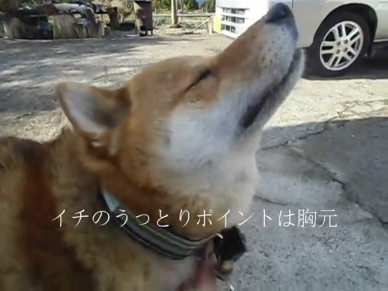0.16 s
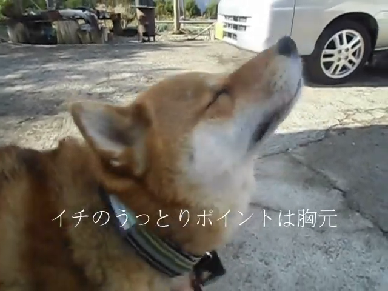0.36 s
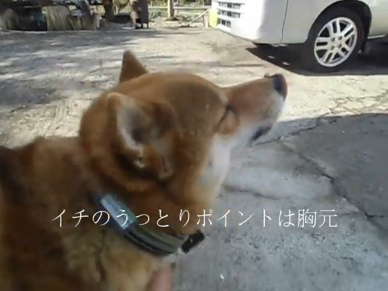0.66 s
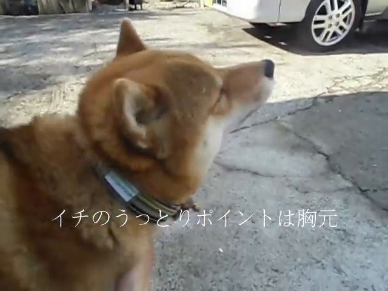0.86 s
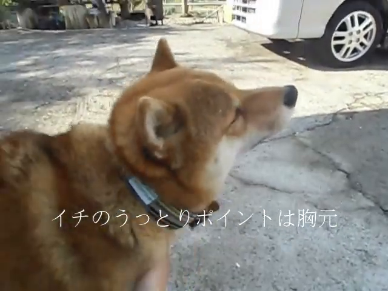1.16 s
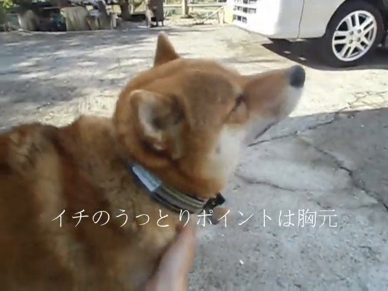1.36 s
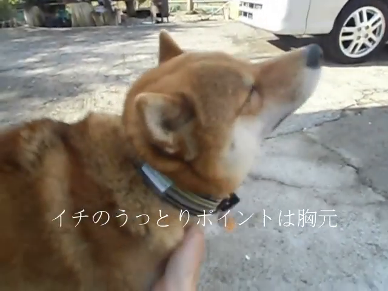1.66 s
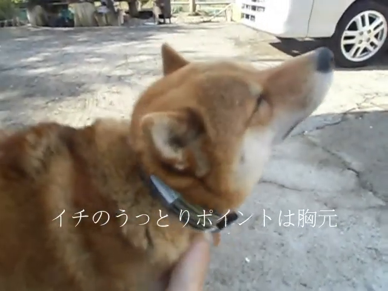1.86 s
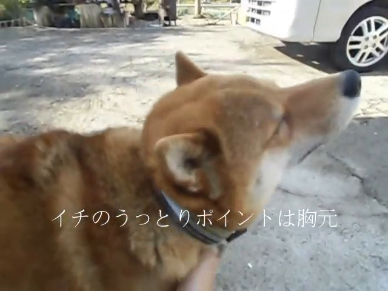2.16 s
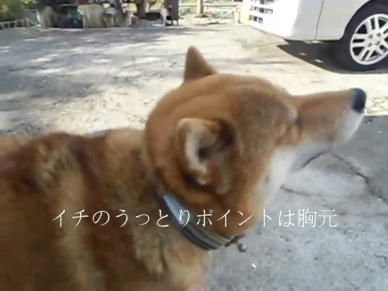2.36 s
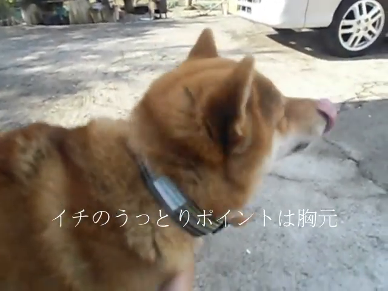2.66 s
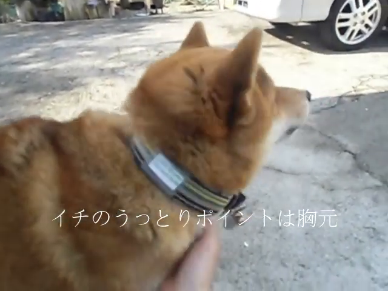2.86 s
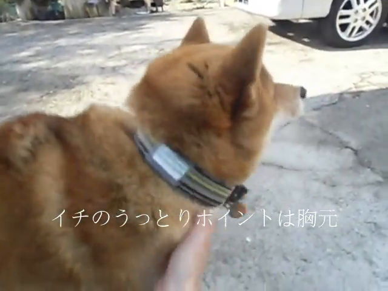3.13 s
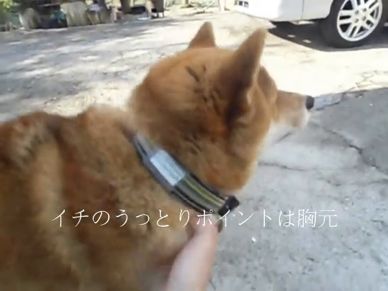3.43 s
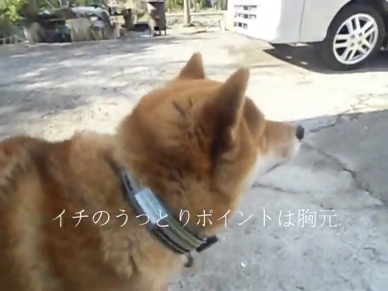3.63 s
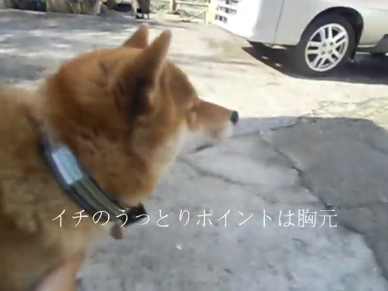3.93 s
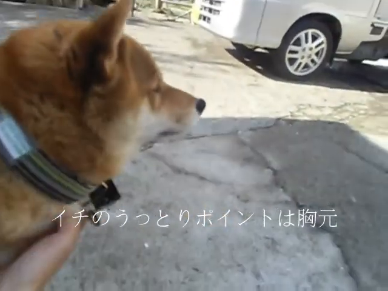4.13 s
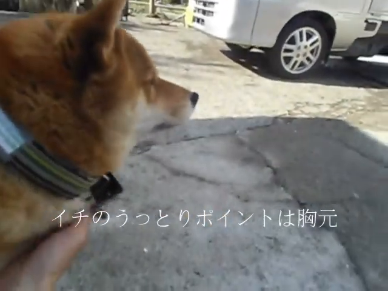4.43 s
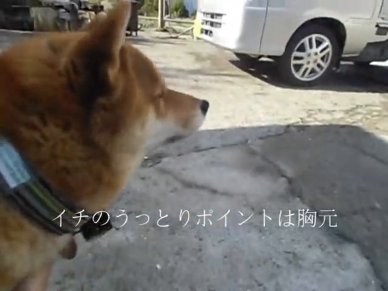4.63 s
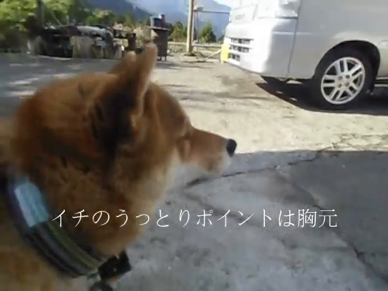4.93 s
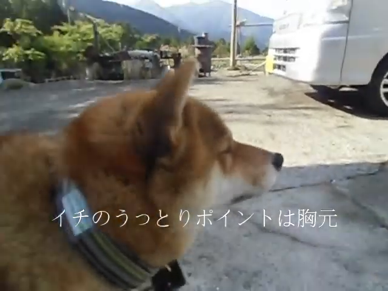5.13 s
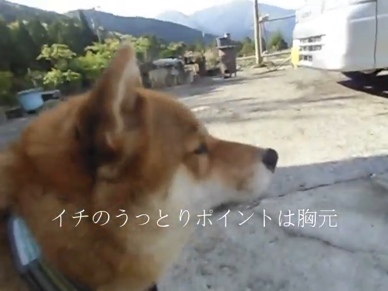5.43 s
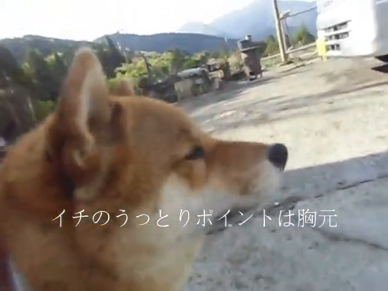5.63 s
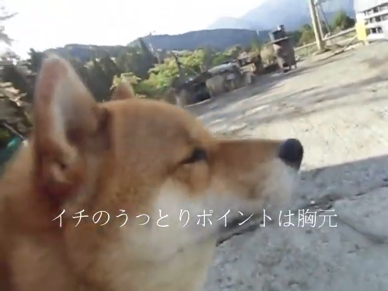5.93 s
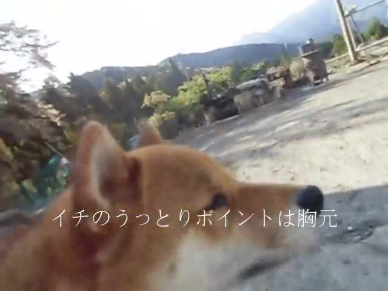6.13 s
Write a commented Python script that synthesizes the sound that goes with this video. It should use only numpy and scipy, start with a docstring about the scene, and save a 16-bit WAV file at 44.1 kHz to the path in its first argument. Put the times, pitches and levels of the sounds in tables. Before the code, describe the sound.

Thin metal tags clink and jingle irregularly on a dog's collar as a hand rubs its chest, over quiet outdoor air and faint birds.

```python
"""Two thin metal tags, one round and one small, clink on a dog's collar as a hand rubs its chest outdoors.
Behind: air rumble, hiss, gusts, a faint whine and far bird calls. Short recorder pops break in.
Rings are decaying sine modes restarted at each touch; rattle and shimmer are decaying noise.
Calls are gliding sines, air is shaped noise, pops are flat offsets at set times.
The sum is clipped and low-passed."""
import sys
import numpy as np
from scipy import signal
from scipy.fft import rfft, irfft
from scipy.io import wavfile

SR = 44100
rng = np.random.default_rng(int(sys.argv[2]) if len(sys.argv) > 2 else 0)


def to_wav(s):
    """Save 16-bit WAV."""
    ch = np.atleast_2d(s).T  # columns
    pcm = np.round(np.clip(ch, -1, 1) * 32767)  # PCM
    wavfile.write(sys.argv[1], SR, pcm.astype(np.int16))


N = 277377

# Metal touches: (time [s], rattle level [dB], round tag ring [dB], angle struck [deg],
# distance from centre [1 = rim], small tag ring [dB],
# damping by fur [1 = the listed t60, smaller rings longer, larger dies sooner])
TAG_TOUCHES = [(0.044, -55, -68.5, 50.0, 0.22, -52, 0.64), (0.073, -56, -58, 64, 0.22, -48, 0.31),
               (0.1013, -27, -42, 10.0, 1.0, -75, 0.74), (0.1159, -15, -24.0, 254, 0.31, -34, 2),
               (0.156, -43, -61.0, 230.0, 0.3, -48, 0.67), (0.1771, -43, -42, 260, 1.0, -44, 0.48),
               (0.2012, -28, -40.5, 20.0, 0.1, -36, 0.42), (0.219, -33, -46, 290.0, 0.3, -36, 0.88),
               (0.232, -47, -54.0, 130.0, 0.2, -35.5, 1.8), (0.2518, -39.5, -37.5, 36, 0.6, -61, 0.68),
               (0.299, -43, -49, 310.0, 0.3, -52, 2), (0.347, -29.5, -27, 20.0, 0.43, -76, 3.2),
               (0.3704, -33, -48, 123, 0.36, -66, 0.47), (0.438, -36.5, -43, 440, 0.1, -62, 0.3),
               (0.451, -37, -36, 236, 0.6, -75, 0.72), (0.5663, -34, -63, 80.0, 0.2, -42, 0.41),
               (0.58, -37.5, -65, 90.0, 0.1, -38, 0.51), (0.6067, -52, -62, 250, 1.0, -44, 0.6),
               (0.654, -36.5, -36, 150, 1.0, -75, 0.17), (0.6656, -26, -28.5, 35, 0.47, -73, 1.8),
               (0.741, -36, -44, 140.0, 0.1, -69, 1.4), (0.757, -37, -32.5, 124, 0.66, -75, 0.77),
               (0.802, -36, -31.5, 6.8, 0.55, -72, 2.8), (0.8231, -42, -38, 180, 1.0, -75, 1.5),
               (0.8482, -28, -30, 280.0, 0.5, -58, 0.96), (0.888, -36, -49, 40.0, 0.1, -40.5, 0.77),
               (0.9748, -34, -40, 58, 0.15, -70, 1.1), (0.985, -30.5, -37.0, 62, 0.08, -75, 4.6),
               (1.034, -40, -37, 140, 0.62, -36, 0.5), (1.039, -12, -21.5, 150, 0.65, -75, 1.6),
               (1.0453, -40, -19.5, 207, 0.56, -75, 3.1), (1.115, -33.5, -29.5, 270.0, 1.0, -70, 0.2),
               (1.1414, -43, -37.5, 310, 1.0, -58, 1.1), (1.1868, -39.5, -50, 58, 0.3, -55, 0.68),
               (1.2685, -29, -22.5, 306, 1.0, -67, 1.5), (1.2785, -36, -31, 380, 0.25, -72, 1),
               (1.2871, -28.5, -33, 280, 0.3, -75, 0.62), (1.322, -33, -37, 470, 0.12, -75, 4),
               (1.333, -42, -39, 270, 0.1, -71, 1.2), (1.359, 0.5, -25.0, 230.0, 0.63, -70, 1.14),
               (1.3674, -46, -20, 210.0, 0.86, -75, 2.5), (1.3996, -39, -39, 29, 0.4, -71, 1.1),
               (1.4153, -37, -31, 240, 0.86, -75, 2.5), (1.423, -35.5, -42, 440, 0.65, -75, 0.35),
               (1.4388, -40, -26.5, 273, 0.57, -44, 2.2), (1.477, -46, -44, 86, 0.35, -60, 0.16),
               (1.6181, -31, -28.5, 317, 0.48, -61, 1.5), (1.6398, -25.5, -32.5, 54, 0.11, -75, 1.23),
               (1.6636, -44, -44.0, 85, 0.2, -75, 0.5), (1.714, -34, -36, 147, 0.54, -75, 0.45),
               (1.732, -47, -36.5, 160, 0.3, -75, 3.3), (1.777, -36, -53, 65, 0.18, -42.5, 0.83),
               (1.8937, -48, -61.0, 250.0, 0.13, -47, 0.4), (1.9032, -43, -45, 260, 0.6, -59, 1.6),
               (1.932, -37, -43, 440, 0.12, -67, 0.36), (1.9605, -42, -44, 40.0, 0.2, -75, 0.35),
               (2.0064, -9, -34, 40.0, 0.16, -75, 1.34), (2.041, -47, -33.5, 78, 0.57, -75, 3.1),
               (2.0647, -41, -50, 97, 0.47, -38.5, 0.6), (2.208, -31.5, -33, 200, 0.17, -75, 1.7),
               (2.23, -34, -36.5, 315, 0.33, -72, 0.47), (2.2645, -35, -40, 70, 0.25, -71, 0.69),
               (2.285, -43, -40.5, 40.0, 0.1, -64, 2.4), (2.3363, -49, -62, 90.0, 0.2, -43.5, 0.89),
               (2.3791, -50, -46.5, 74, 0.86, -59, 0.46), (2.4644, -51, -43, 110.0, 1, -75, 1.7),
               (2.4826, -27.5, -32.5, 11, 0.57, -66, 1.15), (2.511, -35, -41, 190, 0.4, -75, 0.46),
               (2.517, -26, -24, 240, 0.26, -75, 1.4), (2.5705, -29.5, -41.5, 420, 0.12, -75, 1.4),
               (2.5867, -38, -44.0, 70, 0.22, -69, 2), (2.651, -35.5, -44.5, 83, 0.59, -38, 0.43),
               (2.7573, -29, -26.0, 35, 0.66, -69, 1.3), (2.8069, -7, -26.0, 58, 0.14, -80, 1.5),
               (2.948, -47, -57.0, 120.0, 1.0, -43.5, 0.32), (2.972, -51, -57, 360.0, 0.8, -45, 1),
               (3.0525, -39.5, -42, 70.0, 0.3, -40, 0.63), (3.081, -32, -33, 22, 0.45, -70, 0.38),
               (3.094, -30, -40.0, 37, 0.24, -64, 1.4), (3.135, -52, -38, 180, 1.0, -75, 2.9),
               (3.1668, -47, -45, 360.0, 0.92, -75, 0.35), (3.1944, -37, -38.5, 270, 0.17, -65, 0.71),
               (3.2184, -33.5, -49, 340.0, 0.3, -57, 1.6), (3.235, -44, -55, 240.0, 0.9, -46.5, 0.3),
               (3.286, -37, -54.0, 10.0, 0.12, -69, 1.2), (3.3185, -43, -47.0, 59, 0.34, -75, 0.35),
               (3.3303, -30, -27.5, 270.0, 0.6, -65, 1.7), (3.3404, -29, -30.5, 364, 0.72, -51, 1.8),
               (3.41, -32, -35, 310, 0.5, -59, 4), (3.4182, -29, -42.5, 210.0, 0.15, -44, 0.96),
               (3.489, -43, -48.5, 18, 1.0, -73, 1.1), (3.5445, -31.5, -34.5, 260, 0.41, -75, 2.9),
               (3.599, -44, -54, 150, 0.6, -75, 0.4), (3.688, -44, -42, 270, 0.61, -53, 5),
               (3.776, -48, -51, 300.0, 0.5, -68, 4), (3.9286, -47, -49, 115, 0.6, -75, 1.8),
               (4.008, -41.5, -37, 270.0, 1.0, -54, 4.7), (4.122, -51, -59, 270, 0.9, -75, 0.73),
               (4.2005, -51, -53, 250.0, 0.87, -72, 4), (4.2123, -45, -44, 260, 0.25, -75, 4.5),
               (4.332, -52, -60, 280, 0.56, -75, 0.51), (4.4418, -46, -46, 235, 0.9, -50.5, 2.8),
               (4.5482, -46, -50, 260.0, 0.7, -57, 2.1), (4.5782, -45, -59.0, 160, 1.0, -61.5, 0.47),
               (4.6644, -42.5, -37, 256, 1.0, -59, 4), (4.796, -40.5, -55, 290.0, 0.5, -75, 1.1),
               (4.832, -47, -43.5, 116, 0.9, -75, 1.3), (4.874, -44.5, -40.5, 134, 0.72, -75, 4),
               (4.8965, -33, -34, 26, 0.65, -78, 1), (4.9078, -41, -36.0, 39, 0.7, -67, 1.1),
               (4.9966, -33.5, -40, 73, 0.13, -75, 3.5), (5.004, -29, -31.0, 265, 0.2, -75, 4),
               (5.0124, -27.5, -50, 70.0, 0.27, -67, 1.34), (5.066, -37, -46, 310.0, 0.091, -75, 3.1),
               (5.0999, -46, -45.0, 290, 0.72, -75, 1.8), (5.1539, -39.5, -42, 220, 0.7, -69, 4),
               (5.169, -47, -49, 123, 0.96, -75, 0.52), (5.283, -35.5, -40.5, 280, 0.1, -75, 4),
               (5.3113, -41.5, -67.0, 350.0, 0.3, -77, 1), (5.3434, -49, -47, 270.0, 1.0, -75, 4.5),
               (5.4247, -39.5, -51, 340.0, 0.4, -75, 4), (5.5067, -35, -38.5, 290, 0.37, -67, 5.4),
               (5.551, -41, -69.0, 250.0, 0.7, -75, 2.1), (5.9001, -51, -55, 80.0, 0.3, -75, 1.3),
               (5.931, -36, -45.5, 50, 0.14, -75, 1.4), (5.9703, -46, -39, 170.0, 1.0, -75, 3.6),
               (6.027, -43, -39.5, 293, 0.53, -74, 1.3)]
# Tag modes: (group [0-3 round tag, 4-5 small tag], level in group [dB], t60 at damping 1 [s])
MODES = [(0, -0.5, 0.25), (3, -28.5, 0.21), (1, -1.5, 0.11), (1, -14, 0.28), (1, -14, 0.17), (2, 2, 0.21),
         (2, -10, .2), (3, 2, 0.14), (3, -17.5, 0.13), (4, -10, 0.16), (4, 1.5, 0.076), (4, -12, 0.32),
         (4, -13, 0.15), (4, -21, 0.1), (5, -7, 0.069), (5, 7, 0.042)]
# Nominal pitch of each mode: [Hz]
MODE_HZ = [5410, 1990, 7830, 7970, 7625, 10355, 10800, 13613, 8415, 12390, 12550, 11425, 4947, 4160, 15120,
           14870]


def amp(db):
    """dB to gain."""
    return 10 ** (np.asarray(db) / 20)


def in_time(rows):
    """Curve (time [s], value) interpolated at every sample."""
    return np.interp(np.arange(N) / SR, *np.transpose(rows))


def coloured(spectrum):
    """Noise of rms 1 shaped by (frequency [Hz], level [dB]), interpolated in log frequency."""
    hz, db = np.transpose(spectrum)
    grid_hz = np.maximum(np.arange(N // 2 + 1) * SR / N, 1)
    gain = amp(np.interp(np.log(grid_hz), np.log(hz), db))
    noise = irfft(rfft(rng.standard_normal(N)) * gain, N)
    return noise / np.std(noise)


def drift(rate_hz):
    """Normal random values, rate_hz per second, joined by straight lines."""
    slow = rng.standard_normal(int(N / SR * rate_hz) + 2)
    return np.interp(np.arange(N) / SR * rate_hz, np.arange(len(slow)), slow)


def dying(kicks, t60_s):
    """Each kick decays exponentially, 60 dB in t60_s."""
    return signal.lfilter([1], [1, -amp(-60 / (t60_s * SR))], kicks + 1e-12)


def air():
    """Shaped-noise rumble and hiss, 32-65 Hz noise gusts on the microphone, a thin wavering whine."""
    # Air spectrum: (frequency [Hz], relative level [dB per Hz])
    air_spectrum = [(12, -34), (20, 1), (73, -0.5), (634, -17), (1020, -20), (4160, -31.5), (8000, -37.5),
                    (13000, -34.5), (16500, -36.5)]
    # Gusts: (time [s], level [dB])
    gust_curve = [(0, -56), (3.7, -58), (4.3, -49.5), (4.75, -54), (5.2, -47), (5.9, -52), (6.29, -46)]
    air_db, whine_hz, whine_db = -45.5, 7900, -74   # centres of the drifts
    gust_band = signal.butter(2, [32, 65], "band", fs=SR, output="sos")
    gusts = signal.sosfilt(gust_band, rng.standard_normal(N))
    gusts = amp(in_time(gust_curve)) * gusts / np.std(gusts)
    whine_level = amp(whine_db + 4.0 * drift(40))
    whine_phase = 2 * np.pi * np.cumsum(whine_hz * (1 + .004 * drift(60))) / SR
    whine = whine_level * np.sin(whine_phase)
    return amp(air_db + 1.0 * drift(4.73)) * coloured(air_spectrum) + gusts + whine


def bird():
    """Far bird's falling sine whistles; another's short, slightly rising blips of uneven pitch."""
    # Whistles: (start [s], length [s], start pitch [Hz], end pitch [Hz], level before wavering [dB])
    whistles = [(0.905, 0.13, 7150, 6140, -52), (4.41, 0.15, 7100, 5480, -56.5),
                (5.88, 0.14, 6700, 5530, -57)]
    # Blips: (middle [s], level before blip_trim_db and wavering [dB])
    blip_rows = [(2.126, -49), (2.157, -45), (2.356, -47), (3.626, -50), (3.659, -47.5), (3.757, -51),
                 (3.834, -47), (4.104, -45), (4.559, -45.5), (4.63, -50), (5.126, -52), (5.193, -47),
                 (5.229, -44.5), (5.795, -44)]
    blip_s, blip_hz, blip_trim_db = 0.012, 2700, -5.5
    out = np.zeros(N)
    waver_db = 6.1 * drift(200)   # far sound wavers in moving air
    pitch_hz = blip_hz * (1 + 0.033 * rng.standard_normal(len(blip_rows)))
    blips = [(s - blip_s / 2, blip_s, .9 * hz, 1.08 * hz, db + blip_trim_db)
             for (s, db), hz in zip(blip_rows, pitch_hz)]
    for s, length_s, start_hz, end_hz, db in list(whistles) + blips:
        at, count = round(s * SR), round(length_s * SR)
        phase = 2 * np.pi * np.cumsum(np.linspace(start_hz, end_hz, count)) / SR
        level = amp(db + waver_db[at:at + count]) * np.hanning(count)
        out[at:at + count] += level * np.sin(phase)
    return out


def pops():
    """Recorder pops: signal shifts to an offset, may flip sign, and crackles more the larger it is."""
    # Pops: (time [s], length [ms], offset before crackle [full scale], flip rate [Hz, 0 = none])
    pop_rows = [(.1161, 2.15, -.43, 0), (.1183, .5, -.45, 4200), (.11882, .42, .52, 0),
                (1.0422, .35, -.4, 0), (1.0426, .35, .5, 0), (1.35905, .2, .35, 0), (1.3596, 1.62, -.5, 0),
                (2.00694, 1.16, -.5, 3850), (2.0081, 1.62, .38, 1650), (2.00965, .12, -.5, 0),
                (2.0098, 13.5, .08, 0), (2.8067, .8, -.3, 0), (2.81195, .15, .5, 0),
                (2.81365, .25, -.45, 0)]
    stay_share, crackle_depth = 0.66, 0.58   # stay_share: part of a flip period at the unflipped offset
    out = np.zeros(N)
    for s, length_ms, offset, flip_hz in pop_rows:
        at, count = round(s * SR), round(length_ms / 1000 * SR)
        flip_phase = 2 * np.pi * flip_hz * np.arange(count) / SR
        out[at:at + count] += offset * signal.square(flip_phase, stay_share)
    return out * (1 + crackle_depth * np.abs(out) * rng.standard_normal(N))


def shake():
    """Tiny random touches merge into a bright noise shimmer and excite briefly ringing resonators."""
    # Tiny touches: (time [s], base level before random spread [dB])
    shake_curve = [(0.0, -49), (0.96, -50.5), (2.89, -54.5), (3.35, -54.5), (3.71, -66), (4.3, -68),
                   (4.7, -59), (5.3, -58), (5.6, -74), (5.9, -62), (6.29, -68)]
    touches_per_s, ring_db, damping = 170, -11, 5.7   # touches_per_s: centre of the drift
    born = rng.random(N) < touches_per_s * amp(3.0 * drift(25)) / SR
    spread_db = 4.8 * np.minimum(rng.exponential(1, N), 3.5)
    kicks = born * amp(in_time(shake_curve) + spread_db)
    treble = signal.butter(2, 6000, "high", fs=SR, output="sos")
    bright = signal.sosfilt(treble, rng.standard_normal(N))
    out = amp(-2.5) * dying(kicks, 0.015) * bright
    for hz, (group, db, t60_s) in zip(MODE_HZ, MODES):
        radius = amp(-60 * damping / (t60_s * SR))
        step = 2 * np.pi * hz / SR   # rad per sample
        gain = amp(db + ring_db - 2.7 * (group > 3.5))   # small tag weaker
        blows = kicks * gain * rng.standard_normal(N)
        poles = [1, -2 * radius * np.cos(step), radius * radius]
        out += signal.lfilter([0, np.sin(step)], poles, blows + 1e-18)
    return out


def rattle():
    """Touch = sharp noise tick + uneven tail of small rebounds; harder and less damped ones reach lower."""
    # Rattle spectrum: (frequency [Hz], relative level [dB per Hz])
    rattle_spectrum = [(300, -4), (1000, -1.5), (2500, -2), (5000, -0.5), (9000, 4), (13000, 3),
                       (16000, -1.5)]
    tail_t60_s, tail_db = 0.065, -4.5   # t60 at damping 1
    tick_t60_s, tick_db = 0.0013, 6
    rebound_top_db = -16.5   # cap on high-band tail start, before tail_db and drift
    fur_dulls_db = 2.5       # low-band loss per doubling of damping
    noise, t = coloured(rattle_spectrum), np.arange(N) / SR
    low = signal.sosfilt(signal.butter(2, 6500, fs=SR, output="sos"), noise)
    kicks, tail = np.zeros((2, N)), np.zeros((2, N))   # rows: high band, low band
    for s, db, *_, damping in TAG_TOUCHES:
        at = round(s * SR)
        low_db = db + 0.16 * (db + 30) - fur_dulls_db * np.log2(damping)
        gains = amp([[db], [low_db]])
        kicks[:, at] = gains[:, 0]
        since_s = t[:min(N - at, SR // 5)]
        fall_db = 60 * since_s * damping ** .5 / tail_t60_s
        tail[:, at:at + len(since_s)] += gains * amp(min(rebound_top_db - db, 0) - fall_db)
    # contact takes a fraction of a millisecond
    tick = signal.lfilter([.2], [1, -.8], dying(kicks, tick_t60_s))
    level = amp(tick_db) * tick + amp(tail_db + 5.15 * drift(300)) * tail
    return level[0] * (noise - low) + level[1] * low


def group_levels(rows):
    """Ring dB per mode group and touch: round tag follows the spot struck, small tag rings whole."""
    # Round tag groups, low to top: (angle of strongest response [deg], gain there [dB])
    rim_groups = [(90, -7), (360, 0), (180, 0), (270, 3)]
    rim_fall_db = 24   # loss at the rim a quarter turn off the best angle
    best_deg, best_db = np.transpose(rim_groups)
    off_centre = np.clip(rows[:, [4]], 0, 1)
    turn = np.cos(np.radians(rows[:, [3]] - best_deg)) - 1
    round_db = rows[:, [2]] + best_db + rim_fall_db * off_centre * turn
    return np.hstack([round_db, rows[:, [5, 5]]])


def rings():
    """Each touch restarts every mode at a new phase and level, or the level left if louder; fur damps."""
    rows, t = np.array(TAG_TOUCHES), np.arange(N) / SR
    touch_s, damping = rows[:, 0], rows[:, 6]
    last = np.maximum(np.searchsorted(touch_s, t) - 1, 0)
    since_s = np.abs(t - touch_s[last])   # ahead of the first touch its ring swells
    groups_db = group_levels(rows)
    luck = rng.standard_normal((len(rows), 3 * len(MODES)))   # per mode: level, pitch, phase
    out = np.zeros(N)
    for k, (group, db, t60_s) in enumerate(MODES):
        # damping acts most on high modes
        loss_db_per_s = 60 / t60_s * damping ** min(MODE_HZ[k] / 10000, 1) ** 1.1
        start_db = groups_db[:, round(group)] + db + 2.0 * luck[:, 3 * k]
        for i in range(1, len(rows)):
            left_db = start_db[i - 1] - loss_db_per_s[i - 1] * (touch_s[i] - touch_s[i - 1])
            start_db[i] = max(start_db[i], left_db)
        # the tag sinks back into the fur: decay speeds up
        fall_db = loss_db_per_s[last] * since_s * (1.0 + 5.0 * since_s)
        # the tags swing, the small one most
        flutter_db = (5.5 + 1.74 * (group > 3.5)) * drift(100)
        level = signal.lfilter([.07], [1, -.93], amp(start_db[last] - fall_db + flutter_db))
        # the grip shifts the pitch a little
        hz = MODE_HZ[k] * (1 + 0.000996 * luck[last, 3 * k + 1] + 0.00153 * drift(120))
        phase_jumps = 1.19 * np.cumsum(luck[:, 3 * k + 2])[last]
        phase = 2 * np.pi * np.cumsum(hz) / SR + phase_jumps
        out += np.sqrt(2) * level * np.sin(phase)
    return out


def scene():
    """Tags over the open-air background, one channel."""
    return (rings() + rattle() + shake() + bird() + air())[None]


def record(dry):
    """Pops join in, peaks clip at 0.7, a steep low-pass cuts the top."""
    cutoff_hz = 15780
    loud = np.clip(dry + pops(), -.7, .7)
    return signal.sosfilt(signal.ellip(10, .5, 70, cutoff_hz, fs=SR, output="sos"), loud)


dry = scene()
out = record(dry)
to_wav(out)
```